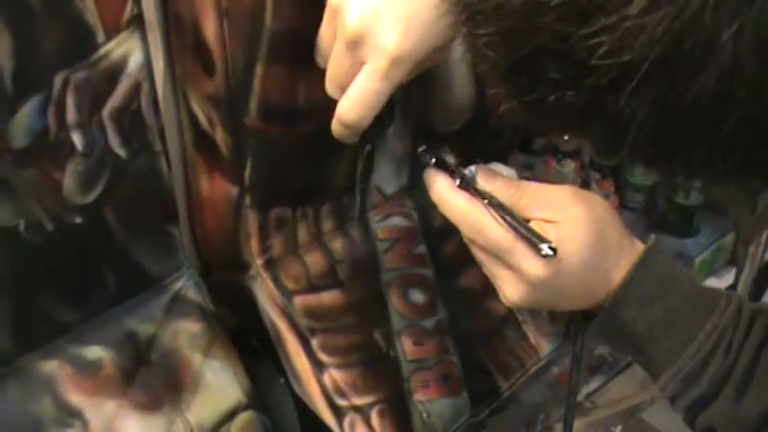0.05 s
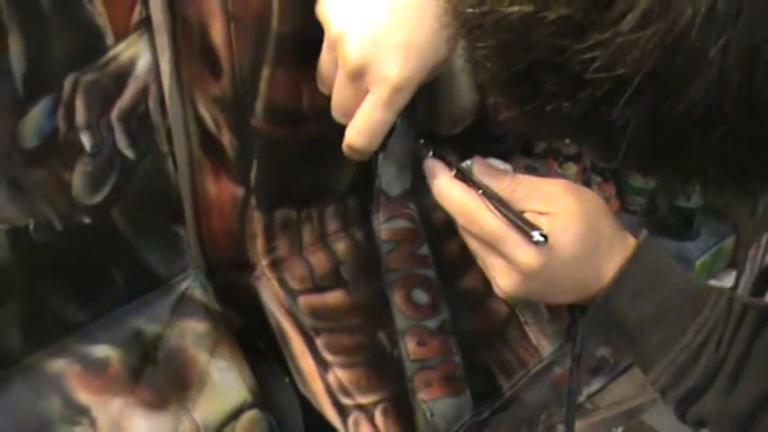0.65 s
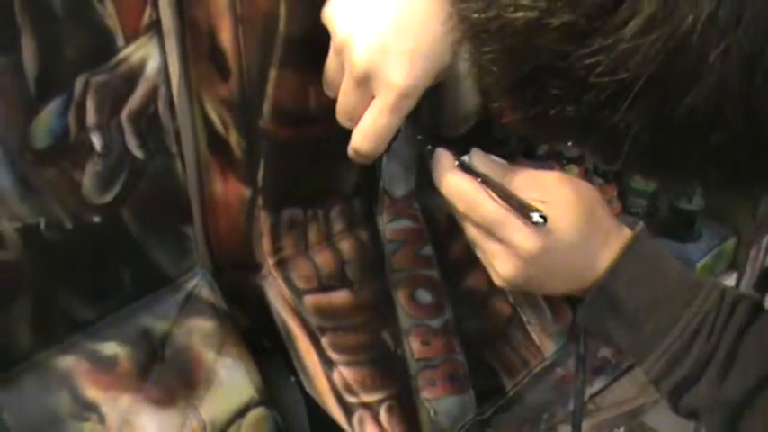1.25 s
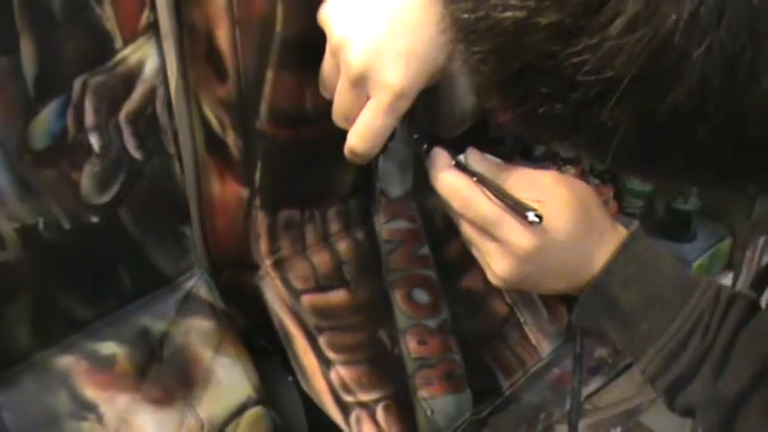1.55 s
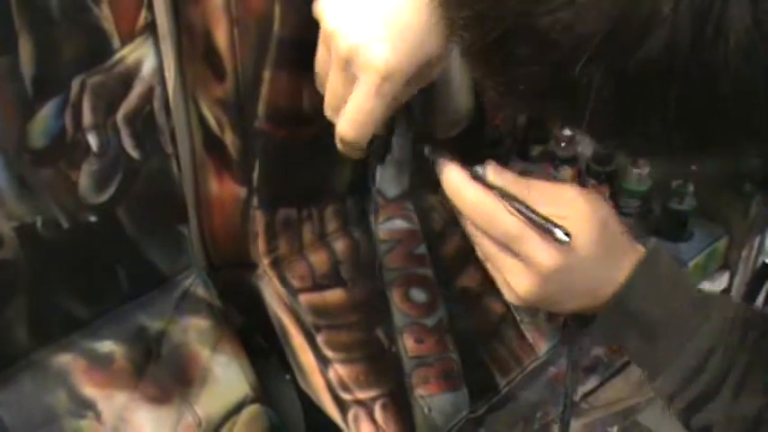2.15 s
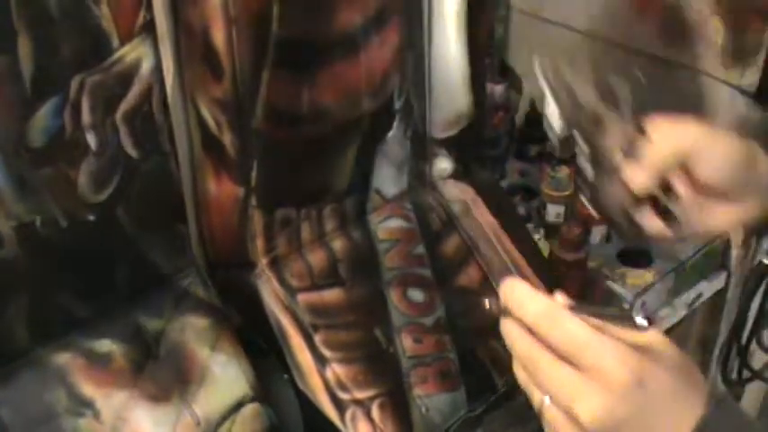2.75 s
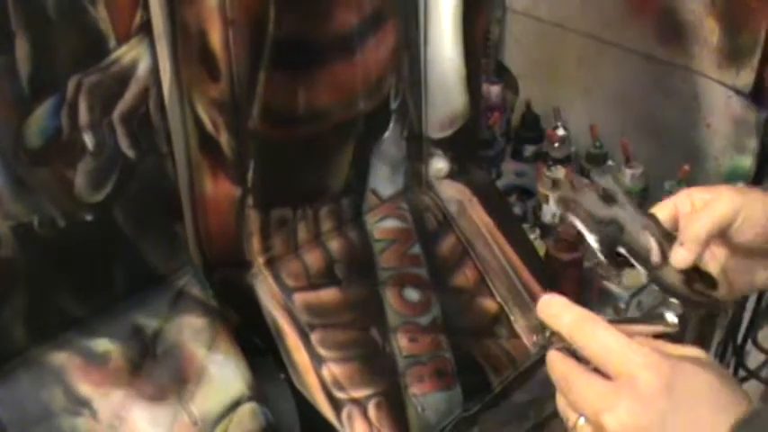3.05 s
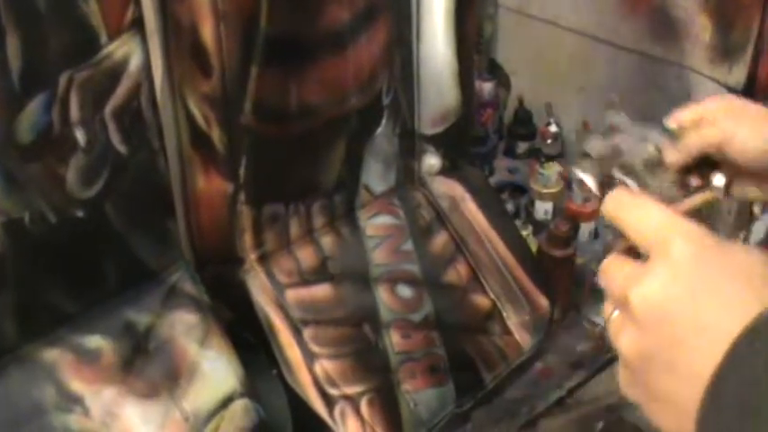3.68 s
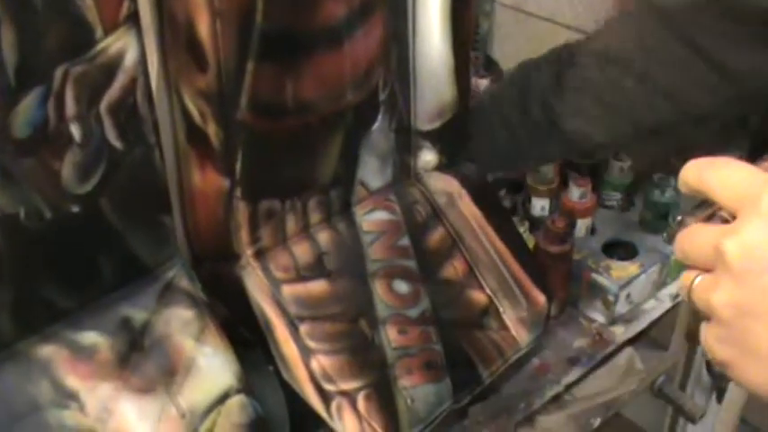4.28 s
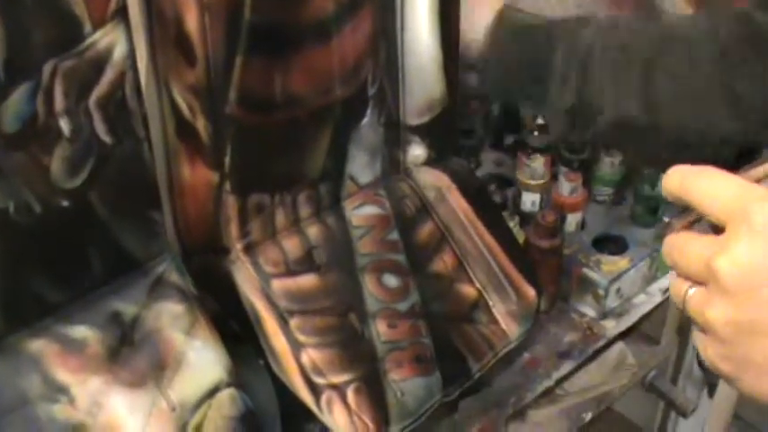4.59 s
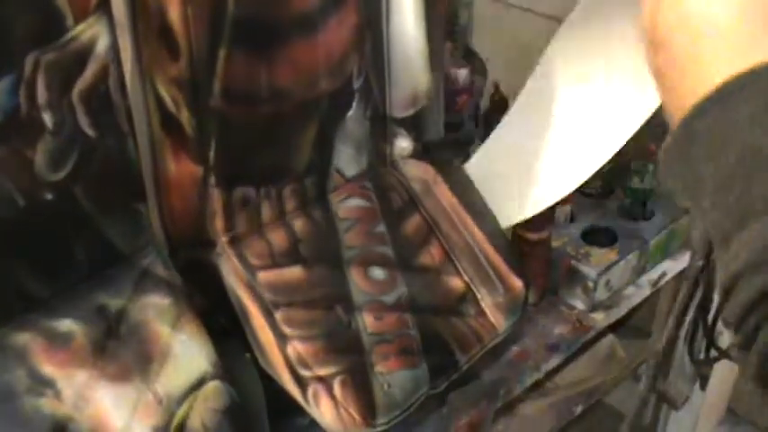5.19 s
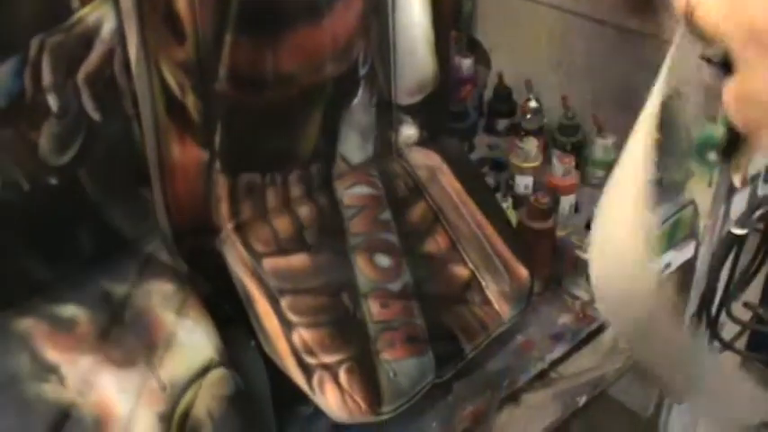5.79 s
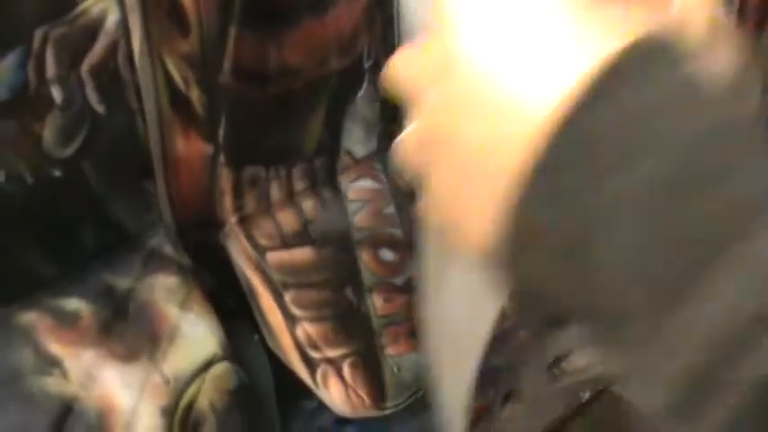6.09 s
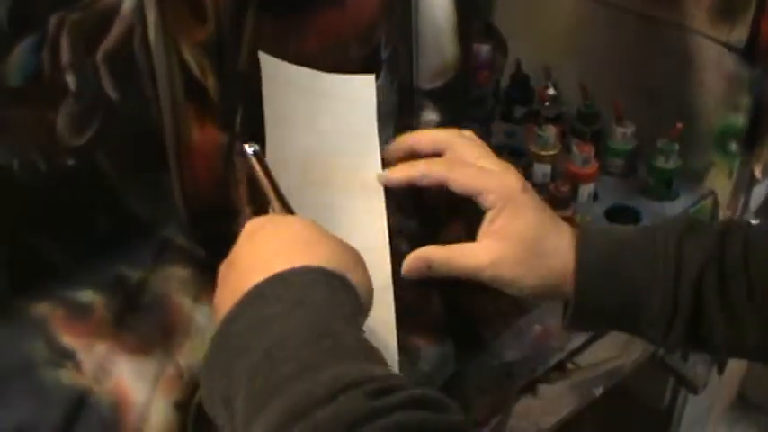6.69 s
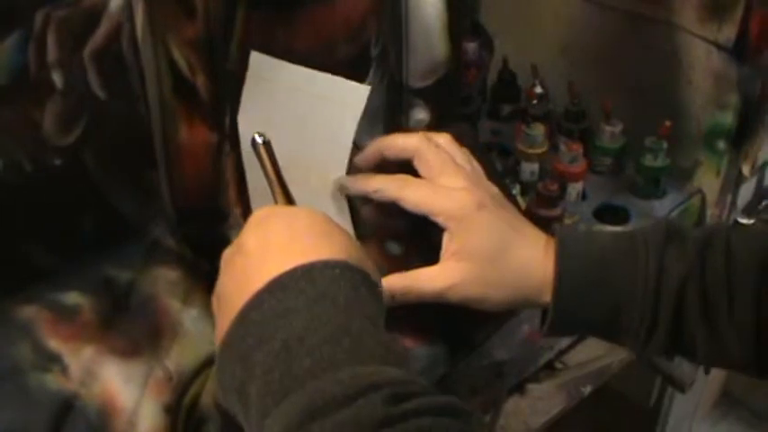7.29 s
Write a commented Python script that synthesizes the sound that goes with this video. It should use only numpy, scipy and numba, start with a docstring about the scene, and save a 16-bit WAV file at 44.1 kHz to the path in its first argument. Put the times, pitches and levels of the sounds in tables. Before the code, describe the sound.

A motor hums steadily in a small workroom over a soft rush of air. An airbrush close to the microphone sprays one loud, bright hiss of about a second, then two short, much fainter puffs. Sleeves swish lightly. A sheet of paper is pulled out, scraping, flapping and snapping as it buckles, then is laid down with quiet rubbing and one more crackle.

```python
"""An airbrush sprays a panel in one long and two short bursts, its turbulent jet ringing in the gap.
Sleeves swish as the arms move. The painter pulls out a sheet of paper, which scrapes as it drags
and snaps as it buckles, and lays it on the panel as a mask. Under it all a motor hums in the small
workroom over a bed of moving air; automatic gain control ducks the hum under the loud hiss."""
import sys
import numpy as np
from scipy import signal
from scipy.fft import rfft, irfft
from scipy.io import wavfile
from scipy.ndimage import uniform_filter1d
from numba import njit

SR = 44100
rng = np.random.default_rng(int(sys.argv[2]) if len(sys.argv) > 2 else 0)


def put_to_file(sound):
    """Save the sound as 16-bit audio at rate SR, in the file named by the first command-line argument."""
    columns = np.atleast_2d(sound).T  # one column per channel
    safe = np.clip(columns, -1, 1)
    whole_steps = np.round(safe * 32767)
    wavfile.write(sys.argv[1], SR, whole_steps.astype(np.int16))


N = 323694
T = np.arange(N) / SR
FREQ = np.maximum(np.arange(N // 2 + 1) * SR / N, 1)

# motor partials: (frequency [Hz], relative level [dB], waver depth [ratio])
MOTOR_PARTIALS = [(240, -1, 0.02), (55.3, -24, 0.33), (275, -23, 0.99), (391, -28.5, 0.89),
                  (843, -22.5, 0.3), (1203, -30.5, 0.6)]
# tone of the room air: (frequency [Hz], relative level [dB])
AIR_EQ = [(18, -5), (34, 1), (55, 0.5), (85, -7), (140, -8.5), (200, -2), (310, -8.5), (520, -10),
          (750, -12.5), (1200, -15.5), (2000, -20), (4000, -25), (9000, -32), (15500, -33)]
# stereo width of the air: (frequency [Hz], side against mid [dB])
AIR_WIDTH = [(60, -38), (110, -14), (200, -17), (380, -10), (700, -3.5), (1290, -3), (2380, -1), (4400, -4),
             (8120, 2.5), (15000, -2)]
# tone of sleeve cloth: (frequency [Hz], relative level [dB])
SLEEVE_EQ = [(1180, -38), (2000, -3.5), (2570, -6.5), (5360, 2), (6210, -1.5), (6830, -5.5), (7770, -3.5),
             (10300, 2.5), (12700, -1.5), (14200, -5), (15800, -8.5)]
# arm movements: (start [s], end [s], level [dB])
ARM_MOVES = [(-.2, .24, -64), (.6, 1.12, -61), (1.08, 1.36, -48.5), (1.88, 2.29, -44), (2.55, 2.8, -55.5),
             (3.03, 3.4, -55.5), (3.4, 3.92, -49.5), (3.9, 4.33, -49), (4.35, 4.5, -44), (4.53, 4.9, -45.5),
             (4.82, 5.53, -45.5), (5.55, 5.86, -43), (5.85, 5.96, -51), (5.98, 6.44, -53), (6.4, 6.83, -47),
             (6.81, 7.18, -49), (7.18, 7.55, -47.5)]
# tone of the sheet: (frequency [Hz], relative level [dB])
SHEET_EQ = [(40, -25), (90, -9), (170, -4.5), (350, -3.5), (560, 4), (720, -0.5), (1050, -0.5), (1400, 3),
            (2400, 0), (3300, -3), (4500, -2), (6000, -8.5), (7600, -20.5), (10500, -24.5), (15500, -46.5)]
# slides and flaps of sheet and sleeve: (peak time [s], level [dB], tilt [dB/octave], length [s])
SLIDE_CUES = [(0.028, -51, 7.5, 0.14), (0.206, -54, 7, .05), (0.586, -51.5, 4, 0.033),
              (.91, -55.5, 2, 0.092), (2.215, -46.5, 4.5, 0.05), (2.93, -52, 9.5, 0.23),
              (4.047, -42.5, -2, 0.011), (4.181, -36, -2.5, 0.019), (4.381, -29, 3, 0.019),
              (4.421, -31.5, -0.5, 0.023), (4.515, -32.5, 10, 0.022), (4.627, -24, 1, 0.021),
              (4.64, -22.5, 7.5, 0.029), (4.743, -43, 7.5, 0.14), (5.069, -33.5, -3, 0.075),
              (5.144, -38, 1, .018), (5.168, -32.5, 0, 0.045), (5.233, -31.5, 1.5, 0.044),
              (5.39, -40.5, 4, 0.095), (5.456, -29, -5, 0.021), (5.626, -30, 3, 0.015),
              (5.701, -30, 14, 0.036), (5.7264, -17, 11, 0.0063), (5.78, -33, 19.5, 0.038),
              (5.805, -30.5, 4, 0.021), (5.886, -39.5, 3.5, 0.079), (6.103, -43.5, 10, 0.13),
              (6.963, -35, 6, 0.043)]
# hollow flaps to thin squeaks: (peak time [s], level [dB], pitch [Hz], width [Hz], length [s])
RING_CUES = [(0.988, -47.5, 392, 40, 0.044), (3.705, -50.5, 383, 40, .1), (2.41, -51.5, 580, 122, 0.24),
             (4.478, -36.5, 1460, 300, 0.093), (4.637, -28.5, 614, 150, .018), (5.163, -35.5, 170, 80, .04),
             (5.416, -34, 3950, 800, 0.032), (5.571, -38, 173, 91, 0.068), (5.823, -30.5, 553, 220, 0.014),
             (6.39, -46.5, 3970, 2010, .11), (6.71, -26, 1280, 700, 0.004)]
# trigger pulls: (open [s], close [s], starting level [dB], share of jet striking the panel [0-1],
# fade as the nozzle draws back [dB/s]); a negative fade swells
TRIGGER_PULLS = [(1.187, 2.113, -4.5, 0.93, 8), (2.336, 2.493, -26, 0.1, 1), (2.542, 2.669, -26, 0.06, -6)]
# tone of the jet on the panel: (frequency [Hz], relative level [dB])
PANEL_JET_EQ = [(1350, -38.5), (1800, -27.5), (3000, -23.5), (4100, -10), (4500, -11), (4900, -5.5),
                (6600, -1), (7500, -5), (8300, -12), (9300, -2.5), (10600, 1.5), (11800, -3.5),
                (13000, -11.5), (15500, -14)]
# tone of the jet in free air: (frequency [Hz], relative level [dB])
FREE_JET_EQ = [(240, -40), (450, -25.5), (1300, -23), (1900, -15), (3500, -13), (4600, -10), (6500, -7.5),
               (8000, -5.5), (11000, 1), (13000, -3), (15800, -3.5)]
# modes between nozzle and panel: (frequency [Hz], width [Hz], level against the jet [dB])
NOZZLE_GAP_MODES = [(2210, 430, -38), (3470, 300, -30), (4510, 210, -16), (6530, 350, -38)]
# level ride on the jet's lower hump: (time [s], gain [dB])
LOWER_HUMP_RIDE = [(1.18, 4), (1.28, 0), (1.36, -2.5), (1.85, -2.5), (2.11, 1)]
# tone of rubbed paper: (frequency [Hz], relative level [dB])
RUB_EQ = [(180, -37), (300, -5), (409, 0), (943, -6.5), (1060, -6), (1490, -8.5), (1700, -4.5),
          (4390, -5.5), (7670, -10.5), (10300, -12.5), (15000, -25)]
# strokes of hand over paper: (start [s], end [s], relative level [dB])
HAND_STROKES = [(2.7, 3.3, -63.5), (4.1, 4.3, -47), (4.37, 4.81, -38.5), (4.9, 5.35, -41.5),
                (5.35, 5.48, -42), (5.55, 5.84, -39.5), (6.02, 6.28, -52.5), (6.55, 7.4, -52)]
# buckles of the sheet: (time [s], level [dB], tilt [dB/octave], decay [s], crack share [0-1])
SNAP_CUES = [(4.1662, -20.5, 13.5, 0.0087, 0.1), (4.549, -28.5, -1.5, 0.021, 0.06),
             (4.622, -20, 2, 0.0051, .25), (5.0323, -15, 1, 0.0082, 0.18), (5.061, -27, -2.5, 0.0056, 0.6),
             (5.1468, -14, -3, 0.0075, 0.08), (5.175, -21.5, -5.5, 0.0068, 0.3),
             (5.426, -22.5, 9, .004, 0.2), (5.444, -27, 7, 0.0023, .3), (5.4525, -28.5, 17, 0.0043, 0.4),
             (5.4829, -17.5, -2.5, 0.0062, 0.08), (5.49, -17.5, -4, 0.0081, 0.1),
             (5.555, -31.5, -2.5, 0.031, 0.08), (5.815, -27.5, -9, 0.0058, 0), (6.330, -44, 6, 0.019, 0),
             (6.7058, -22, -4, 0.0074, 0.5)]
# stereo placement of the paper: (frequency [Hz], phase lead of the left channel [rad])
SHEET_PHASE = [(50, -0.08), (300, -0.43), (690, -0.71), (1500, -0.73), (4000, -0.23), (16000, -1)]


def undb(db):
    """Decibels to gain."""
    return 10 ** (np.asarray(db) / 20)


def over_pitch(rows, freq=FREQ):
    """Join rows of (frequency [Hz], value) on a log-frequency axis."""
    hz, value = np.transpose(rows)
    return np.interp(np.log(freq), np.log(hz), value)


def unit(x):
    """Scale to rms 1."""
    return x / np.sqrt(np.mean(x ** 2) + 1e-18)


def colour(x, eq):
    """Shape a signal with an EQ curve, at rms 1."""
    return unit(irfft(rfft(x) * undb(over_pitch(eq)), N))


def resonate(spectrum, hz, width):
    """Sound of a spectrum driving a steep-skirted resonance, at rms 1."""
    response = 1 / (1 + 1j * (FREQ / hz - hz / FREQ) * hz / width) ** 2
    return unit(irfft(spectrum * response, N))


def noise():
    """White noise."""
    return rng.standard_normal(N)


def drift(rate_hz):
    """Smooth random modulation at rms 1."""
    return unit(irfft(rfft(noise()) / (1 + (FREQ / rate_hz) ** 4), N))


def grains(rate_hz, depth_db=1.5):
    """Friction: noise broken into tiny slips of uneven strength."""
    return unit(noise() * undb(depth_db * drift(rate_hz)))


def strokes(rows, speed_power):
    """Each movement speeds up and slows down in half a sine; amplitude is a power of speed."""
    envelope = 0
    for start, end, db in rows:
        progress = np.clip((T - start) / (end - start), 0, 1)
        envelope += undb(db) * np.abs(np.sin(np.pi * progress)) ** speed_power
    return envelope


def swell(peak_s, length_s, rise_share=0.42):
    """Exponential rise and fall; the two time constants add up to the length."""
    return np.exp(-np.maximum((peak_s - T) / rise_share, (T - peak_s) / (1 - rise_share)) / length_s)


def pair(mid, side):
    """Left and right from mid and side."""
    return np.array([mid + side, mid - side])


def motor(waver_hz=5, wander_rad=0.037, side_db=-21):
    """A motor hums in wavering partials, equally loud left and right but slightly out of step."""
    hum = 0
    for hz, db, depth in MOTOR_PARTIALS:
        phase = 2 * np.pi * hz * T + wander_rad * drift(1.6)
        waver = drift(waver_hz) * np.sin(phase) + drift(waver_hz) * np.cos(phase)
        hum += np.sqrt(2) * undb(db) * (np.sin(phase) + depth * waver)
    return pair(hum, undb(side_db) * signal.hilbert(hum).imag)


def room_air(trim_db=-8, flicker_db=1.5):
    """Moving air rushes and rumbles, centred in the lows and wide in the highs."""
    mid = colour(noise(), AIR_EQ)
    side = irfft(rfft(colour(noise(), AIR_EQ)) * undb(over_pitch(AIR_WIDTH)), N)
    return pair(mid, side) * undb(trim_db + flicker_db * drift(14))


def sleeves(rest_db=-69, flutter_db=1.05):
    """Cloth slides on cloth with a soft, high hiss and stirs faintly between movements."""
    envelope = strokes(ARM_MOVES, speed_power=0.77) + undb(rest_db)
    return colour(noise(), SLEEVE_EQ) * envelope * undb(flutter_db * drift(28))


def through_sheet(push, tilt_db, tilt_above_hz=450, size=1024):
    """The sheet answers each slip: a tight crease is bright, a wide flap is dull."""
    freq = np.maximum(np.arange(size // 2 + 1) * SR / size, 1)
    db = over_pitch(SHEET_EQ, freq) + tilt_db * np.log2(np.maximum(freq / tilt_above_hz, 1))
    # minimum phase keeps the attack free of pre-ring
    cepstrum = irfft(np.log(undb(db)))
    cepstrum[1:size // 2] *= 2
    cepstrum[size // 2 + 1:] = 0
    response = irfft(np.exp(rfft(cepstrum)))
    return signal.fftconvolve(push, response / np.linalg.norm(response))


def slides():
    """Dense slips swell as the sheet drags over an edge or flaps."""
    slips, out = grains(rate_hz=2000), np.zeros(N)
    for peak, db, tilt_db, length in SLIDE_CUES:
        near = np.abs(T - peak) < .3
        push = (slips * swell(peak, length))[near]
        out[near] += undb(db) * through_sheet(push, tilt_db)[:len(push)]
    return out


def handling_rings():
    """Friction drives a single resonance of the thing in hand."""
    friction, out = rfft(noise()), 0
    for peak, db, hz, width, length in RING_CUES:
        out += undb(db) * resonate(friction, hz, width) * swell(peak, length)
    return out


def airbrush(open_s=0.0026, close_s=0.0032, flutter_db=0.08, shimmer_db=0.43, split_hz=7000):
    """The valve lets out a turbulent jet; near the panel it rings in two humps and a few narrow modes."""
    on_panel, turbulence = colour(noise(), PANEL_JET_EQ), rfft(noise())
    for hz, width, db in NOZZLE_GAP_MODES:
        on_panel += undb(db) * resonate(turbulence, hz, width)
    lower_hump = irfft(rfft(on_panel) / (1 + (FREQ / split_hz) ** 10), N)
    ride_db = np.interp(T, *np.transpose(LOWER_HUMP_RIDE))
    on_panel += lower_hump * (undb(ride_db) - 1)
    on_panel *= undb(shimmer_db * drift(4))
    in_air, out = colour(noise(), FREE_JET_EQ), 0
    for start, stop, db, share, fade in TRIGGER_PULLS:
        opening = (1 + np.tanh((T - start) / (2 * open_s))) / 2
        closing = (1 - np.tanh((T - stop) / (2 * close_s))) / 2
        level_db = db - fade * np.clip(T - start, 0, stop - start)
        jet = np.sqrt(share) * on_panel + np.sqrt(1 - share) * in_air
        out += undb(level_db) * opening * closing * jet
    return out * undb(-flutter_db * drift(70))


def rubbing(trim_db=-1, uneven_db=1.7, ticks_per_s=45, tick_db=-10, tick_spread_db=3.5):
    """Under the hand, paper brushes unevenly and crinkles in small random ticks."""
    brush = colour(grains(rate_hz=1100), RUB_EQ) * undb(uneven_db * drift(32))
    ticks = (rng.random(N) < ticks_per_s / SR) * undb(tick_spread_db * noise())
    crinkle = unit(through_sheet(ticks, tilt_db=4)[:N])
    return (brush + undb(tick_db) * crinkle) * strokes(HAND_STROKES, speed_power=0.34) * undb(trim_db)


def snaps():
    """The sheet buckles with one crack, then ripples race across it and die."""
    out, t = np.zeros(N), T[:SR // 10]
    for time, db, tilt_db, decay, crack in SNAP_CUES:
        ripples = rng.standard_normal(len(t)) * np.exp(-t / decay)
        push = np.sqrt(1 - crack) * ripples / np.linalg.norm(ripples)
        push[0] += np.sqrt(crack)
        snap = through_sheet(push, tilt_db) * np.sqrt(decay * SR / 2)
        start = int(time * SR)
        out[start:start + len(snap)] += undb(db) * snap[:N - start]
    return out


def room(x, wet_db, t60_s, side_db, predelay_s=0.003):
    """Direct sound plus the short, nearly mono tail of a cluttered room."""
    t = T[:SR // 2]
    tails = rng.standard_normal((2, len(t))) * undb(-60 * t / t60_s) * (t > predelay_s)
    mid, side = (signal.fftconvolve(x, tail / np.linalg.norm(tail))[:N] for tail in tails)
    return pair(x + undb(wet_db) * mid, undb(side_db) * side)


def widen_treble(stereo, corner_hz=5800):
    """The image widens as the wavelength shrinks to the spacing of the two microphone ports."""
    left, right = stereo
    side = irfft(rfft(left - right) / 2 * (1 + (FREQ / corner_hz) ** 2), N)
    return pair((left + right) / 2, side)


def from_the_side(stereo):
    """Sound from one side reaches the two microphone ports out of step."""
    turn = np.exp(.5j * over_pitch(SHEET_PHASE))
    return irfft(rfft(stereo) * np.array([turn, 1 / turn]), N)


def scene(bed_db=-45.5, bed_rise_db_per_s=0.77):
    """Hiss in the centre, paper to one side, and a slowly rising bed of motor and air."""
    hiss = room(airbrush() + sleeves(), wet_db=-13, t60_s=0.16, side_db=-31.5)
    paper = room(snaps() + slides() + rubbing() + handling_rings(), wet_db=-14, t60_s=0.19, side_db=-24)
    bed = (motor() + room_air()) * undb(bed_db + bed_rise_db_per_s * T)
    return widen_treble(hiss) + from_the_side(paper) + bed


@njit
def follow(level, attack, release):
    """Envelope follower with separate rates up and down."""
    out, held = np.empty(len(level)), 0.
    for i in range(len(level)):
        held += (level[i] - held) * (attack if level[i] > held else release)
        out[i] = held
    return out


def record(dry, ceiling_db=-13.5, attack_s=0.00091, release_s=0.28, look_ahead_s=0.0032, top_hz=15750):
    """Gain control holds loud sounds at a ceiling and lets go slowly; a steep low-pass cuts the top."""
    rms = np.sqrt(np.abs(uniform_filter1d(dry.mean(axis=0) ** 2, size=256)))
    envelope = follow(rms, 1 / (attack_s * SR), 1 / (release_s * SR))
    ahead = np.interp(T + look_ahead_s, T, envelope)
    gain = undb(ceiling_db) / np.maximum(ahead, undb(ceiling_db))
    return signal.sosfilt(signal.ellip(12, .1, 80, top_hz, fs=SR, output="sos"), dry * gain)


dry = scene()
out = record(dry)
put_to_file(out)
```